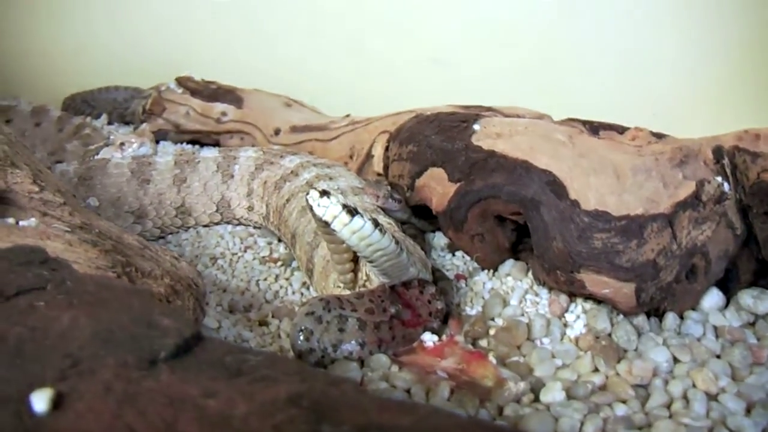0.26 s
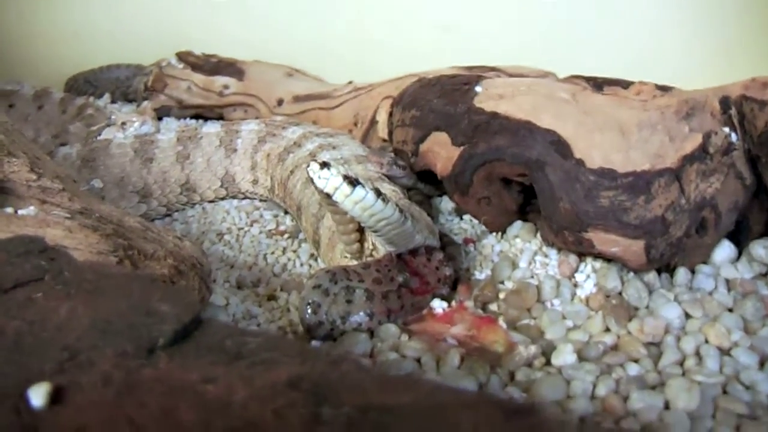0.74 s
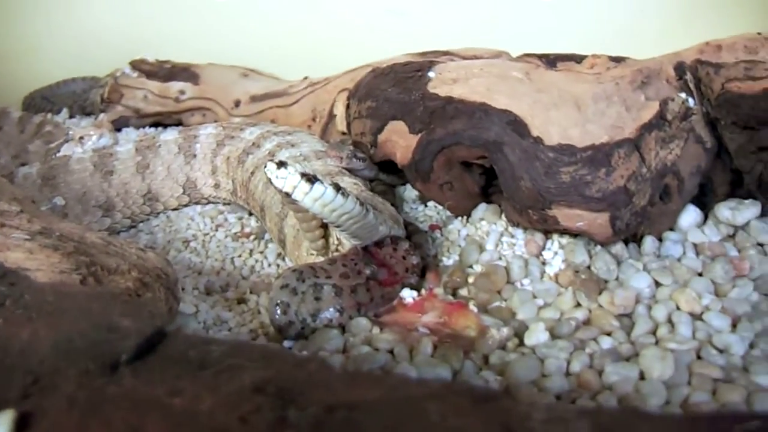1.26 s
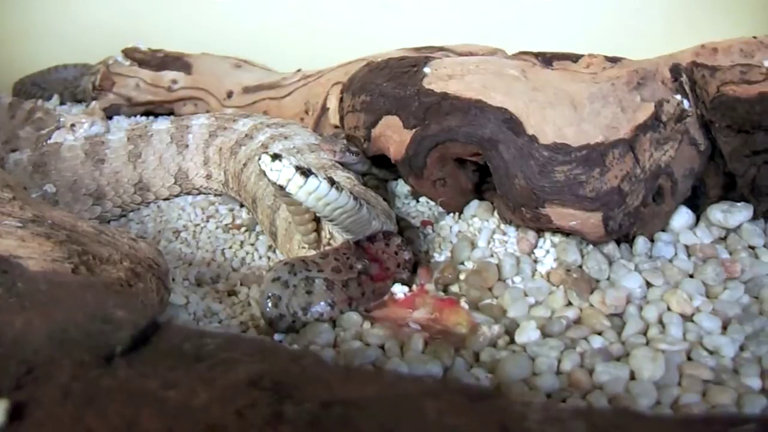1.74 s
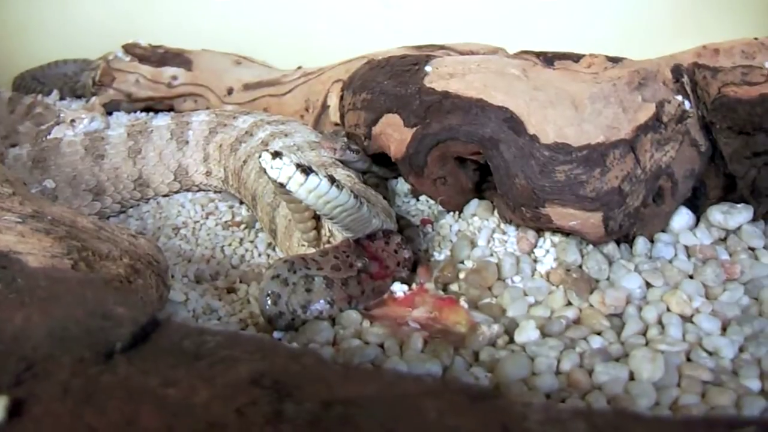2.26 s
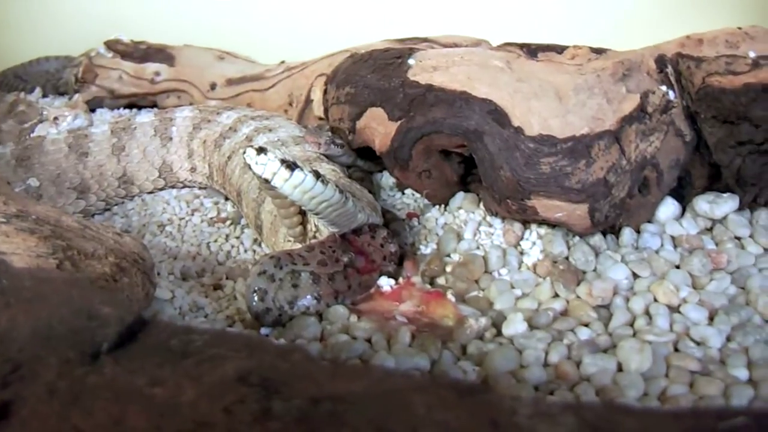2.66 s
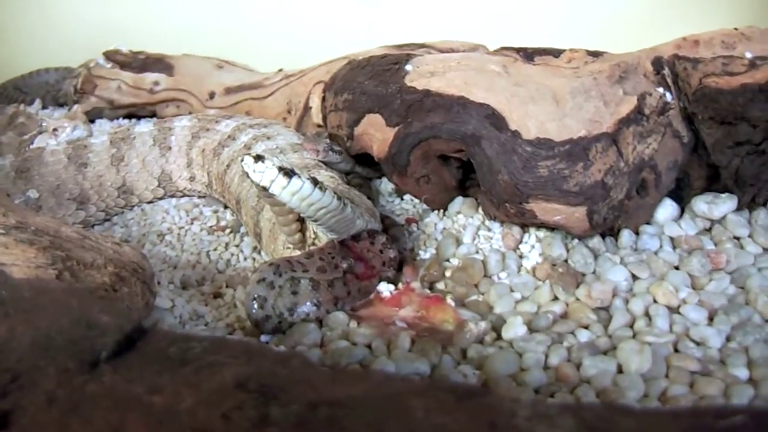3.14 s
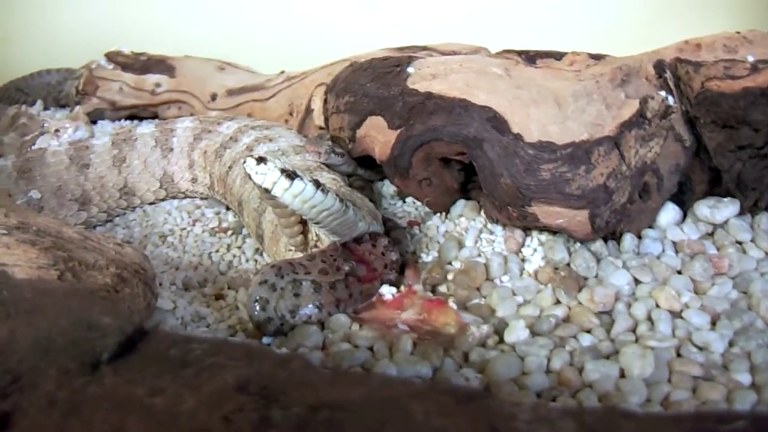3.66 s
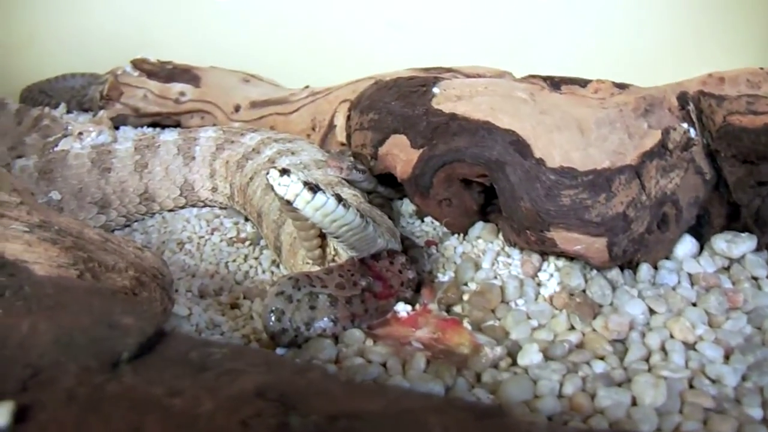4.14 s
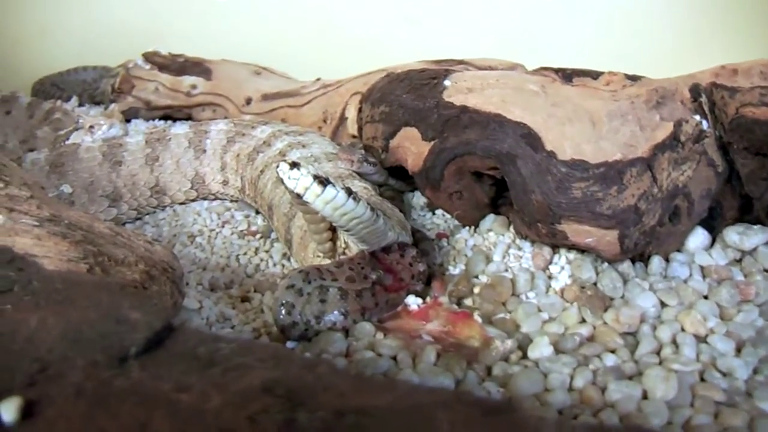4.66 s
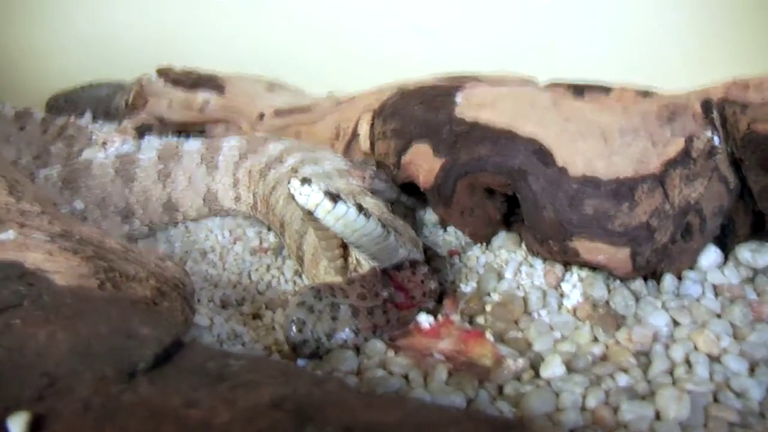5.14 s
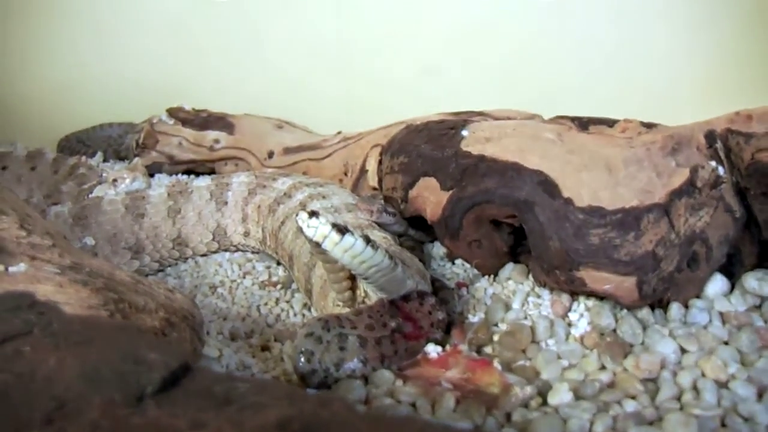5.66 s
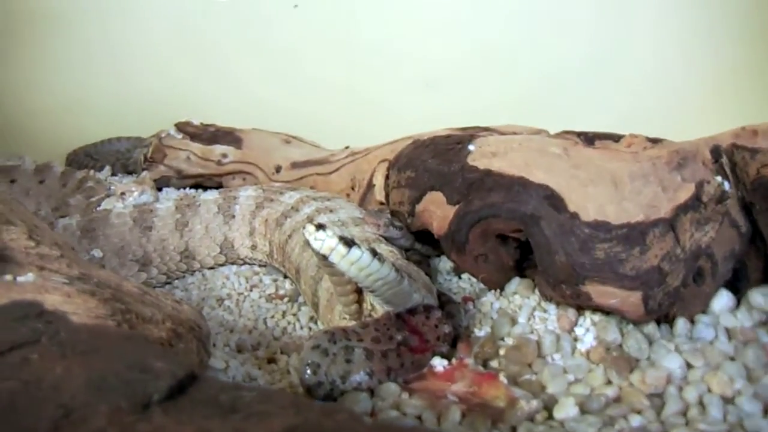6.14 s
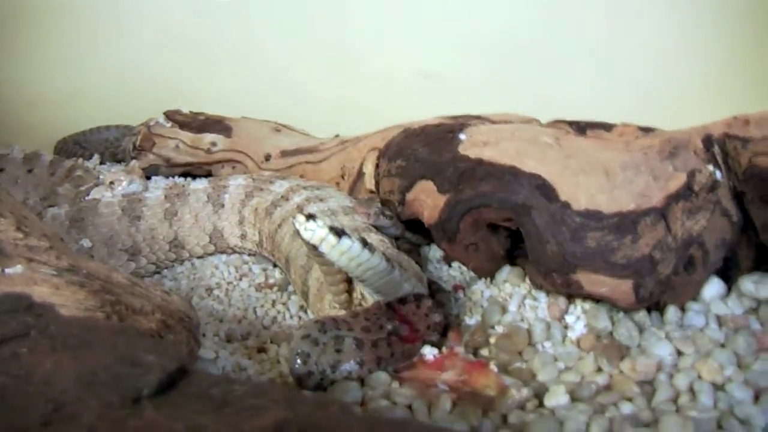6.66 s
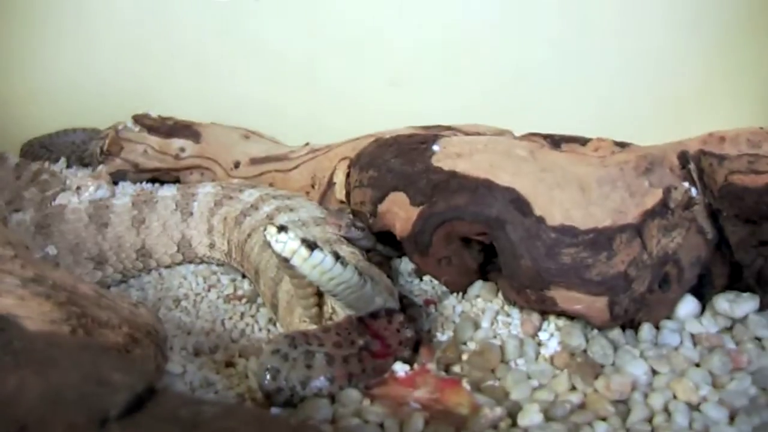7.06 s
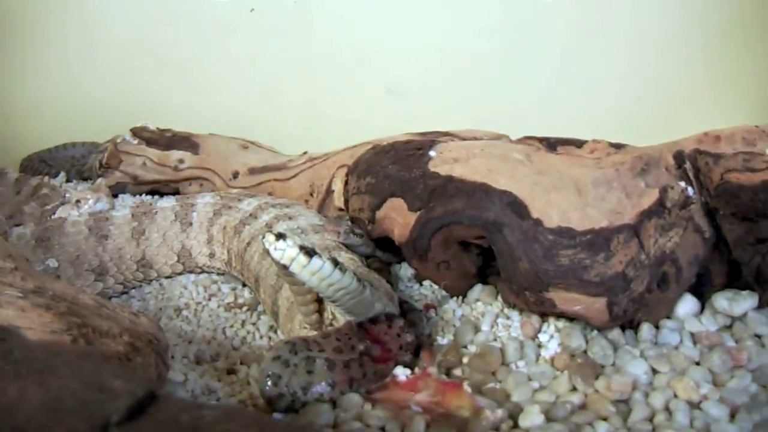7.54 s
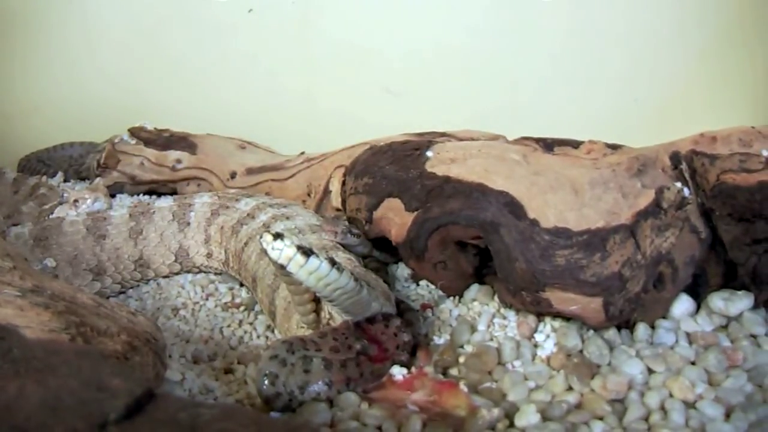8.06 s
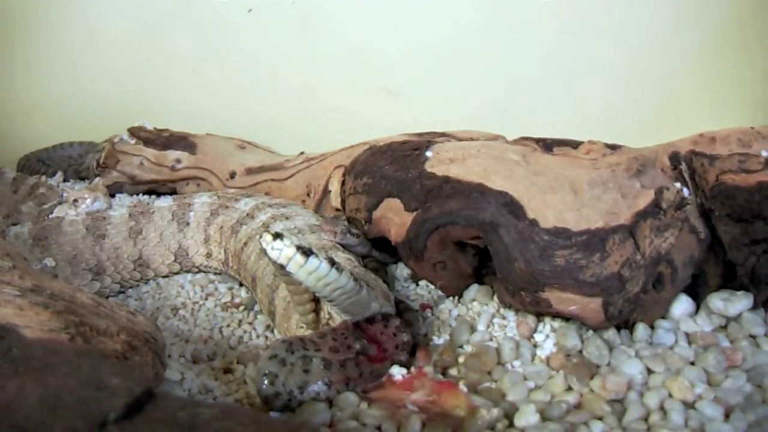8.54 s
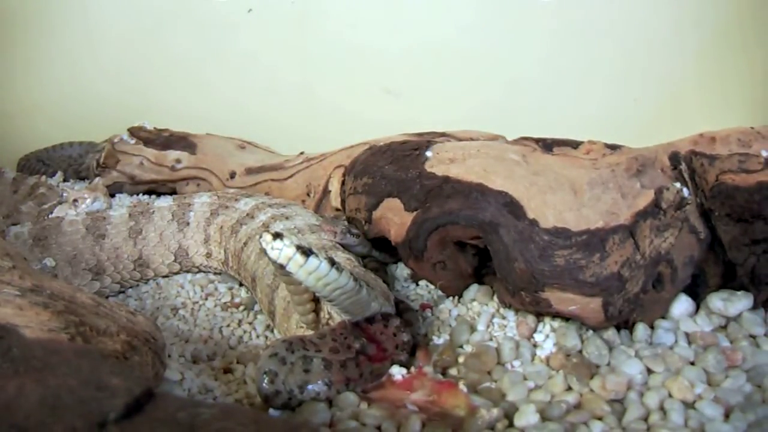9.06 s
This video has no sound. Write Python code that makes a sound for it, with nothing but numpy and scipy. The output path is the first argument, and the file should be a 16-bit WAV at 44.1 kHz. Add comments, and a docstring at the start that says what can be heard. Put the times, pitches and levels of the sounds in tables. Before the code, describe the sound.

Dull knocks and light plastic ticks from a camera being handled come at irregular intervals over faint room noise.

```python
"""Handling a plastic camera

Fingers shift on a hand-held camera by a quiet glass tank on gravel. Dull knocks ring the hollow
case, its seams slip with bright ticks, and it lurches in the hand with a low rumble.
Under it all lies faint room noise, coloured by the same case."""
import sys
import numpy as np
from scipy import signal
from scipy.fft import rfft, irfft
from scipy.io import wavfile
from scipy.ndimage import uniform_filter1d

SR = 44100
rng = np.random.default_rng(int(sys.argv[2]) if len(sys.argv) > 2 else 0)


def transcribe(signal):
    """Save signal, clipped to [-1, 1], as a 16-bit WAV file at the path in sys.argv[1]."""
    frames = np.atleast_2d(signal).T
    limited = np.clip(frames, -1, 1)
    pcm = np.round(limited * 32767).astype(np.int16)
    wavfile.write(sys.argv[1], SR, pcm)


N = 409688


def gain_of(db):
    """Decibels to a gain."""
    return 10 ** (np.asarray(db) / 20)


def eq_curve(points, hz):
    """Levels in dB, joined along a log-frequency axis."""
    point_hz, db = np.transpose(points)
    return np.interp(np.log(hz + 1), np.log(point_hz + 1), db)


def add(mix, start_s, sound):
    """Drops a sound into the mix."""
    part = mix[round(start_s * SR):][:len(sound)]
    part += sound[:len(part)]


def ring(modes, centre_hz, spread_oct, floor_db, decay_scale, grip, t):
    """Dying sines, favouring the modes near centre_hz; the grip detunes each a little. Peak 1."""
    hz, db, t60 = np.transpose(modes)[:, :, None]
    detune, phase = grip
    db = db + np.maximum(-6 * (np.log2(hz / centre_hz) / max(spread_oct, .05)) ** 2, floor_db)
    cycles = hz * (1 + .012 * detune) * t + .07 * phase
    envelope = gain_of(db - 60 * t / (t60 * np.clip(decay_scale, .1, np.sqrt(3))))
    out = (envelope * np.sin(2 * np.pi * cycles)).sum(0)
    return out / abs(out).max()


def bursts(bands, noise):
    """Dying noise bands (centre [Hz], width [octaves], t60 [s]), each with a one-cycle attack."""
    t, hz = np.arange(len(noise)) / SR, np.fft.rfftfreq(len(noise), 1 / SR)
    centre_hz, width, t60 = np.transpose(bands)[:, :, None]
    out = irfft(rfft(noise) * gain_of(-6 * (np.log2(hz / centre_hz + 1e-3) / width) ** 2))
    attack = 1 - np.exp(-(t * centre_hz) ** 2)
    return out / out.std(1)[:, None] * gain_of(-60 * t / t60) * attack


# Tone of the room: (frequency [Hz], level [dB])
ROOM_EQ = [(24, -70), (40, -51), (65, -34), (172, -20.5), (485, 1), (744, -14), (865, -31), (1110, -20),
           (1990, -15.5), (3050, -20), (5310, -24), (7950, -29.5), (10200, -22), (15300, -39), (16500, -40)]
# Peaks and notches the case puts on the room tone: (centre [Hz], width [Hz], gain [dB])
CASE_EQ = [(476, 14, -1), (637, 39, 2), (1320, 30, 8), (1920, 29, 8.5), (2174, 140, 4.5), (2760, 170, 3.5),
           (3900, 69, -12.5), (5200, 120, 3.5), (8200, 590, -5.5)]
# Fader ride on the room tone: (time [s], level [dB])
ROOM_FADER = [(0.0, -57), (0.4, -58), (1.0, -56.5), (2.3, -59.5), (3.3, -57.5), (6.0, -59), (7.2, -58),
              (9.29, -59)]


def room_tone():
    """A bed of noise coloured by the case; faint patches drift through it, more so in the lows."""
    frames, hz = N // 256 + 5, np.fft.rfftfreq(1024, 1 / SR)
    real, imag, drift = rng.standard_normal((frames, 513, 3)).T
    drift = uniform_filter1d(uniform_filter1d(drift, size=10, axis=0), size=16, axis=1)
    depth_db = np.where(hz < 800, 1.6, 0.8)[:, None]
    case_db = sum(db * np.exp(-((hz - centre) / width) ** 2) for centre, width, db in CASE_EQ)
    colour_db = eq_curve(ROOM_EQ, hz) + case_db
    spectra = (real + 1j * imag) * gain_of(colour_db[:, None] + depth_db * drift / drift.std())
    noise = signal.istft(spectra, nperseg=1024, noverlap=768)[1][:N]
    fader_db = np.interp(np.arange(N) / SR, *np.transpose(ROOM_FADER))
    return noise / noise.std() * gain_of(fader_db)


# Hollow body of the case: (frequency [Hz], level [dB], base t60 [s])
HOLLOW_MODES = [(216, 4, 0.15), (254, 1.5, 0.16), (266, -16, 0.34), (361, -0.5, 0.19), (393.7, 2, 0.18),
                (415, -1, 0.13), (462.2, -1, 0.18), (488, -2.5, 0.071), (514.6, 12, 0.081),
                (602.5, 7, 0.16), (656.5, 7.5, 0.15), (792, -10, 0.23), (935, -6, 0.15)]
# Noise layers of a knock, in order thud, scrape, tank afterglow: (centre [Hz], width [octaves], t60 [s])
KNOCK_BANDS = [(319, 0.31, 0.064), (1000, 0.94, 0.081), (2060, 0.18, 0.6)]
# Knock cues: (time [s], ring peak [dB], pitch [Hz], decay scale [x], mode spread [octaves],
# scrape against the ring peak [dB])
KNOCK_CUES = [(0.075, -28.5, 464, 0.65, 0.17, -45), (0.411, -39.5, 350, 0.7, 0.22, -37),
              (1.011, -16.5, 350, 1.06, 0.39, -44), (1.026, -35, 445, .89, .24, -38),
              (1.037, -27.5, 256, 1.12, 0.26, -37), (1.165, -29, 555, 0.57, 0.19, -24.5),
              (1.961, -14, 770, 0.24, 0.38, -37), (1.96, -7.5, 385, 0.31, 0.25, -36),
              (2.976, -25.5, 205, 1.05, 0.71, -40), (3.22, -35, 586, 0.37, 0.16, -17.5),
              (3.729, -35, 418, 0.7, 0.64, -20), (3.764, -23.5, 434, 0.64, 0.86, -20.5),
              (3.831, -29.5, 426, 0.57, 0.12, -23.5), (3.948, -36, 517, 0.51, 0.17, -42),
              (4.064, -22, 426, 0.53, 0.21, -29), (4.148, -23.5, 555, 0.49, 0.86, -26.5),
              (4.187, -24.5, 587, 0.95, 1, -19), (4.294, -20.5, 403, 0.93, 0.25, -25),
              (4.317, -28, 416, 0.58, 1, -20), (4.882, -41.5, 440, 1.6, 0.44, -15),
              (5.123, -38.5, 635, 0.52, 0.16, -31), (5.213, 6, 457, 0.31, 0.25, -33),
              (5.222, -2.5, 615, 0.56, 0.25, -32), (5.236, -5, 402, 0.4, 0.089, -30),
              (5.506, -33, 433, 0.5, 0.2, -23), (5.603, -21, 376, 1.23, 0.27, -29.5),
              (5.627, -28, 436, 1.14, 0.49, -39), (6.005, -31, 373, 0.88, 0.29, -33),
              (6.028, -32.5, 367, 1, .23, -44), (6.046, -39.5, 406, 1.9, 0.33, -38),
              (6.162, -28.5, 350, 0.83, 0.12, -26.5), (6.175, -25.5, 392, 1.1, 0.5, -26),
              (6.2, -34, 400, 0.89, 0.43, -25), (6.232, -24, 433, 1.25, 0.36, -19.5),
              (6.246, -25, 606, 0.69, 0.28, -19.5), (6.272, -28.5, 383, 1.16, 0.12, -36),
              (6.39, -33, 525, .5, 0.19, -21.5), (6.566, -13.5, 374, 1.13, 0.32, -30.5),
              (6.59, -22, 426, 0.8, 1, -43), (6.609, -37, 360, .95, .5, -26),
              (6.732, -3.5, 410, .37, 0.24, -30), (6.842, -30, 424, 1.5, 0.56, -7.5),
              (6.869, 2, 493, 0.82, 0.34, -50), (6.875, -4.5, 604, 0.32, .49, -30),
              (6.887, -4.5, 324, 0.67, 0.17, -21.5), (6.917, -18, 616, 1, 0.42, -19),
              (6.944, -20, 314, 0.86, 0.42, -36.5), (6.953, 0, 572, 0.53, 0.23, -37),
              (6.963, -10, 520, 0.59, .55, -36), (6.971, -2, 348, 0.31, 0.1, -30.5),
              (7.116, -31.5, 395, 1.5, 0.52, -19), (7.164, -26, 386, 1, 0.33, -26.5),
              (7.207, -24.5, 433, 0.92, 0.45, -33), (7.22, -17.5, 398, 0.56, 0.2, -35),
              (7.264, -31.5, 430, .64, 0.27, -40), (7.42, -20, 502, 0.82, 0.27, -25),
              (7.433, -18, 487, 0.55, 0.32, -34.5), (7.464, -37, 487, 0.62, 0.28, -25),
              (7.505, -28.5, 494, 0.42, .11, -38), (7.716, -26.5, 496, 0.64, 0.27, -25),
              (7.947, -27.5, 497, .3, 0.2, -41), (8.031, -29, 444, 0.85, 0.25, -34),
              (8.124, -26, 520, 0.72, 0.22, -34), (8.143, -25.5, 458, 1.6, 0.13, -31),
              (8.155, -9.5, 464, 0.4, 0.07, -36)]


def case_knocks():
    """Soft blows ring the hollow modes near their pitch, layered with thud, scrape and afterglow."""
    out, t = np.zeros(N), np.arange(12000) / SR
    afterglow_db = -56
    low_cut = signal.butter(4, 170, "high", fs=SR, output="sos")  # a small case radiates no bass
    grips = rng.standard_normal((len(KNOCK_CUES), 2, len(HOLLOW_MODES), 1))
    noises = rng.standard_normal((len(KNOCK_CUES), len(t)))
    for cue, grip, noise in zip(KNOCK_CUES, grips, noises):
        start_s, db, pitch_hz, decay_scale, spread_oct, scrape_db = cue
        attack = 1 - np.exp(-(t * pitch_hz) ** 2)  # about one cycle long
        body = ring(HOLLOW_MODES, pitch_hz, spread_oct, floor_db=-20.5,
                    decay_scale=decay_scale, grip=grip, t=t)
        body = signal.sosfilt(low_cut, attack * body)
        # A looser grip (longer ring) thuds more; harder blows ring more and thud less.
        thud_db = -11.5 + 5.5 * np.log2(max(decay_scale, .1)) - 0.14 * (db + 19.5)
        texture = gain_of([thud_db, scrape_db, afterglow_db]) @ bursts(KNOCK_BANDS, noise)
        add(out, start_s, gain_of(db) * (body + texture))
    return out


# Stiff modes of the case wall: (frequency [Hz], level [dB], base t60 [s])
WALL_MODES = [(935, -12, 0.071), (1065, -36.5, 0.078), (1460, 0, 0.064), (1394, 25.5, 0.017),
              (1650, 22, 0.018), (2049, 24.5, 0.03), (2020, -17, 0.02), (2130, -4, 0.02),
              (2060, -11, 0.027), (2505, -60, 0.02), (2770, -7, 0.13), (3000, -27, 0.059)]
# Tone of a slipping seam: (frequency [Hz], level [dB])
SEAM_EQ = [(1470, -13), (2500, 6.5), (3240, 0.5), (3510, 3), (3860, -0.5), (7670, 1), (12500, 5),
           (15200, -1.5), (16500, -41)]
# Tick cues: (time [s], crack peak [dB], bright spot [Hz], crack t60 [s],
# clack against the crack [dB], clack pitch [Hz])
TICK_CUES = [(0.5823, -44, 3370, .027, -11, 2670), (0.6094, -48, 12900, .022, -6, 1920),
             (0.633, -48, 3370, .022, -14, 2670), (0.672, -49, 3500, 0.04, -4, 1920),
             (0.7459, -42, 9700, .065, 1, 2150), (0.7605, -40.5, 10600, 0.092, 0, 1150),
             (1.0023, -46, 4120, 0.045, -6, 2120), (1.1286, -51, 3720, 0.046, -1, 2140),
             (1.1657, -29, 9600, 0.038, -7.5, 2720), (1.1888, -43.5, 3530, .026, -1, 1870),
             (1.378, -43.5, 13200, 0.016, -9, 1330), (1.4074, -44.5, 6240, .053, -25, 1850),
             (1.5128, -50, 5160, .025, -9, 2790), (1.6451, -31, 12000, .012, -5, 2070),
             (1.8148, -43, 9300, 0.019, -12, 1940), (1.924, -46.5, 5140, .027, -8, 2120),
             (1.9584, -30.5, 8550, 0.063, 4, 2100), (3.2055, -42, 9840, .025, -10, 2700),
             (3.222, -41, 3100, .027, -0.5, 1300), (3.3594, -46.5, 8200, .043, -13, 2780),
             (3.5345, -43, 8300, .022, -9, 2820), (3.5723, -46, 8150, .032, -6, 2790),
             (3.5914, -47, 7860, .028, -2, 2800), (3.6064, -40.5, 8300, 0.057, -5, 2750),
             (3.6214, -44, 7850, 0.037, -4, 2790), (3.711, -49, 3590, .022, -15, 2280),
             (3.7329, -42.5, 9170, 0.031, -9, 1350), (3.7591, -24, 13200, .021, -9, 2040),
             (3.7693, -25, 8500, 0.021, -17, 2710), (3.782, -35, 9770, .031, -8, 2800),
             (3.7967, -37.5, 9990, .022, -5, 2780), (3.8258, -42.5, 10900, .022, -4, 2150),
             (3.95, -49, 9000, .022, -7, 2110), (3.9797, -50, 9000, .022, -1, 2080),
             (4.064, -50, 3030, 0.02, -7, 1060), (4.1485, -48, 6000, .022, -15, 1000),
             (4.188, -40, 6000, 0.03, -26, 1510), (4.2928, -36, 10800, 0.023, -11, 1520),
             (4.3187, -43, 3130, .027, -15, 940), (4.8812, -49, 3400, .024, 4, 2110),
             (5.1174, -44, 9250, 0.04, 0, 2100), (5.1245, -23.5, 9300, .026, -9.5, 2090),
             (5.214, -13, 3520, 0.032, -2.5, 1560), (5.2204, -18.5, 5630, 0.027, -27, 1000),
             (5.2264, -26, 2970, 0.027, 8, 2120), (5.2374, -24, 2960, 0.024, 6, 910),
             (5.5092, -37.5, 4900, .0073, -4, 2250), (5.69, -46.5, 11600, 0.035, -2, 1150),
             (5.7265, -40, 13100, 0.015, -17, 2030), (5.871, -48, 3520, 0.021, -17, 2700),
             (6.172, -36.5, 9960, 0.011, -11, 2750), (6.1776, -43, 3570, 0.021, 2, 1280),
             (6.229, -39.5, 9700, .034, -4, 1380), (6.248, -48, 3420, .036, -8, 1050),
             (6.562, -32.5, 6350, 0.022, -5.5, 2250), (6.6172, -38.5, 12900, .019, -19, 2080),
             (6.7278, -28, 9720, 0.059, -23, 1900), (6.7323, -14.5, 3430, 0.018, 0.5, 1390),
             (6.8428, -23, 9500, .039, -11, 1960), (6.8484, -29, 4000, 0.022, -17, 2080),
             (6.8557, -28, 9840, 0.0244, -6, 2070), (6.867, -15, 13000, 0.024, -1, 2120),
             (6.8734, -17, 3060, .018, 5.5, 1430), (6.8763, -16, 5750, 0.018, -3, 902),
             (6.8878, -11.5, 4060, 0.01, 1.5, 2090), (6.8948, -22, 4270, 0.027, -12, 1904),
             (6.9021, -15.5, 10600, 0.016, 1.5, 2620), (6.9425, -36, 3280, .038, 0, 910),
             (6.9544, -25, 3440, .033, 6, 910), (6.9674, -27, 10600, 0.027, -5, 895),
             (6.9731, -22.5, 2770, 0.021, 8, 1400), (7.1157, -44, 3250, .022, -17, 2900),
             (7.141, -47.5, 3280, 0.042, 0, 1230), (7.224, -49, 3000, .028, -6, 1000),
             (7.421, -27, 4600, .011, -9, 930), (7.4332, -43, 4150, .025, 4, 1310),
             (7.7137, -44, 3060, .014, 7.5, 1280), (8.1244, -49, 3280, 0.022, 7, 1290),
             (8.1566, -26.5, 3800, 0.018, 5, 1390)]


def seam_ticks():
    """A seam slips: a crack of noise with one bright spot, a weaker rattle, and a clack of the wall."""
    out, t = np.zeros(N), np.arange(4096) / SR
    hz = np.fft.rfftfreq(len(t), 1 / SR)
    squeak_hz, squeak_width_hz, squeak_t60 = 8000, 150, .14
    squeak_band = 20 / (1 + ((hz - squeak_hz) / squeak_width_hz) ** 2)
    rattle = gain_of(-23.5 - 60 * (t / 0.071) ** 2)  # loose parts chatter on, then stop short
    cues = np.r_[TICK_CUES, faint_tick_cues()]
    noises = rng.standard_normal((len(cues), len(t)))
    grips = rng.standard_normal((len(cues), 2, len(WALL_MODES), 1))
    for (start_s, db, bright_hz, t60, clack_db, clack_hz), noise, grip in zip(cues, noises, grips):
        # More clack, or a higher bright spot, rolls off more of the crack's top end.
        tilt_db_per_oct = -2 - 0.3 * np.log2(bright_hz / 6000) - 0.21 * (clack_db + 7)
        colour_db = eq_curve(SEAM_EQ, hz) + tilt_db_per_oct * np.log2(hz / 6000 + 0.18)
        spectrum = rfft(noise) * gain_of(colour_db)
        bright_boost = 1 + 1.3 / (1 + ((hz - bright_hz) / 500) ** 2)
        decay = gain_of(-60 * t / max(t60, .004))
        crack = irfft(spectrum * bright_boost) * (decay + rattle)
        if abs(bright_hz - squeak_hz) < 2 * squeak_width_hz:  # one seam sings in a narrow band
            crack += irfft(spectrum * squeak_band) * gain_of(-20 - 60 * t / squeak_t60)
        clack = ring(WALL_MODES, clack_hz, spread_oct=0.24, floor_db=-7,
                     decay_scale=0.37 + t60 / 0.034, grip=grip, t=t)
        clack *= 1 - np.exp(-t / 0.0004)
        add(out, start_s, gain_of(db) * (crack / abs(crack).max() + gain_of(clack_db) * clack))
    return out


def faint_tick_cues(count=16, level_db=-53, scatter_s=.12):
    """Small slips scattered around the main ticks, each borrowing its parent's tone."""
    parents = np.array(TICK_CUES)[rng.integers(0, len(TICK_CUES), count)]
    offset, strength = rng.standard_normal((count, 2)).T
    return np.c_[abs(parents[:, 0] + scatter_s * offset), level_db + 1.5 * strength, parents[:, 2:]]


# Lurches of the case: (time [s], level [dB])
SWAY_CUES = [(1.011, -66), (1.961, -48), (2.976, -46), (3.764, -56), (4.187, -69), (5.212, -54),
             (5.221, -46), (5.505, -60), (6.272, -72), (6.568, -63), (6.732, -56), (6.842, -59),
             (6.886, -50), (6.963, -46), (7.116, -52), (7.207, -52), (7.22, -53), (7.266, -58),
             (7.421, -62)]


def case_sways(centre_hz=133, width_oct=0.4, t60=0.16):
    """The whole case lurches in the hand: a short low rumble."""
    out = np.zeros(N)
    for (start_s, db), noise in zip(SWAY_CUES, rng.standard_normal((len(SWAY_CUES), 12000))):
        add(out, start_s, gain_of(db) * bursts([(centre_hz, width_oct, t60)], noise)[0])
    return out


def reverb(sound, t60=.5, attack_s=0.0026):
    """A short tail off the tank and the walls, with the colour of the room."""
    t = np.arange(SR // 2) / SR
    colour = gain_of(eq_curve(ROOM_EQ, np.fft.rfftfreq(len(t), 1 / SR)))
    wash = irfft(rfft(rng.standard_normal(len(t))) * colour)
    tail = wash * gain_of(-60 * t / t60) * (1 - np.exp(-t / attack_s))
    return signal.oaconvolve(sound, tail / np.linalg.norm(tail))[:N]


def scene():
    """Mono mix: close handling and a trace of reverb over the room tone."""
    handling = case_knocks() + case_sways() + seam_ticks()
    return (handling + gain_of(-47) * reverb(handling) + room_tone())[None]


def record(dry):
    """A small microphone thins the bass, saturates lopsidedly on hard hits and loses the very top."""
    thin = signal.sosfilt(signal.butter(2, 80, "high", fs=SR, output="sos"), dry)
    saturated = np.tanh(thin / 0.87) - 0.17 * thin ** 4
    high_cut = signal.firwin(511, 16500, window=("kaiser", 9), fs=SR)
    return signal.oaconvolve(saturated, high_cut[None], "same")


dry = scene()
out = record(dry)
transcribe(out)
```